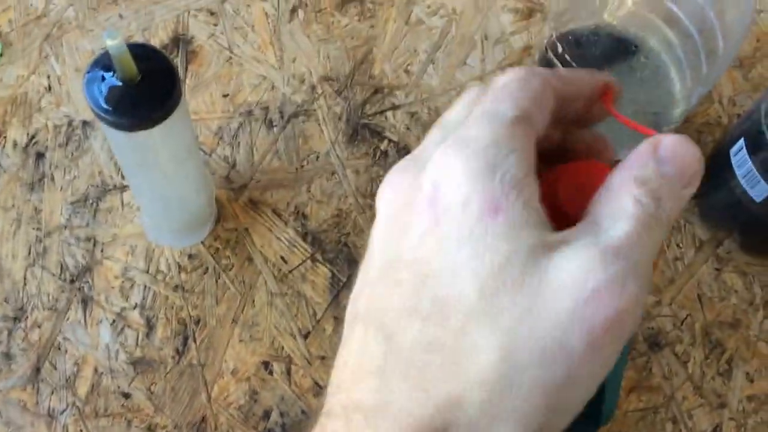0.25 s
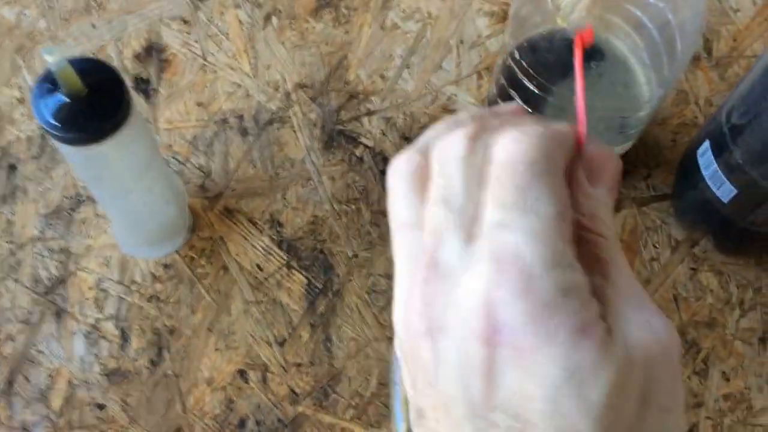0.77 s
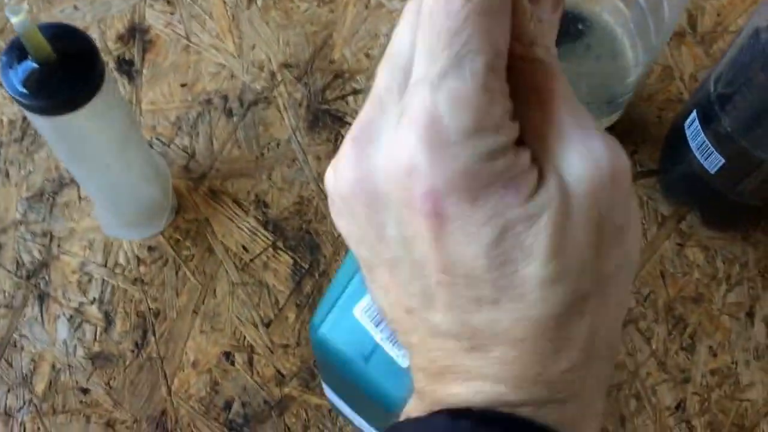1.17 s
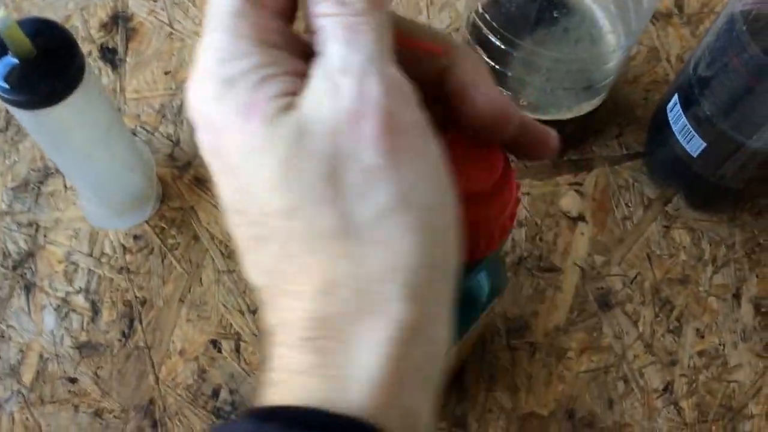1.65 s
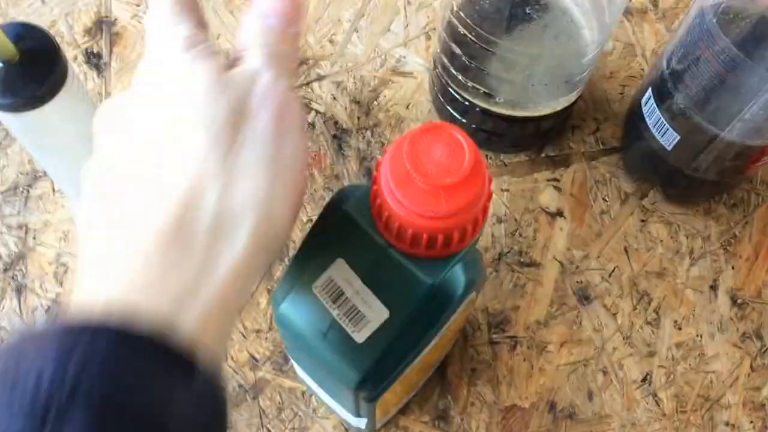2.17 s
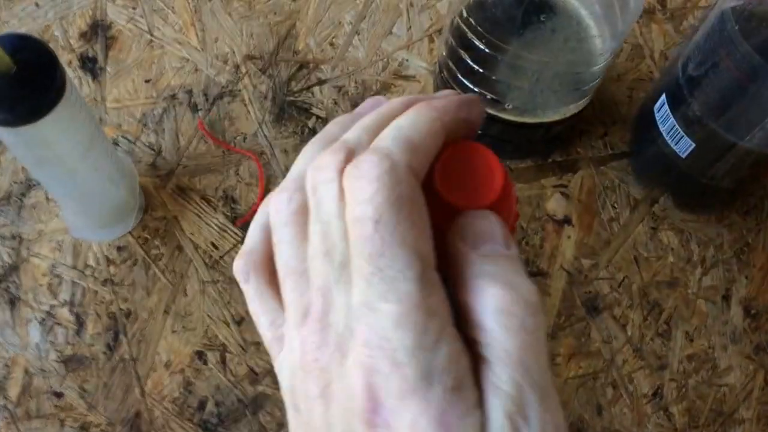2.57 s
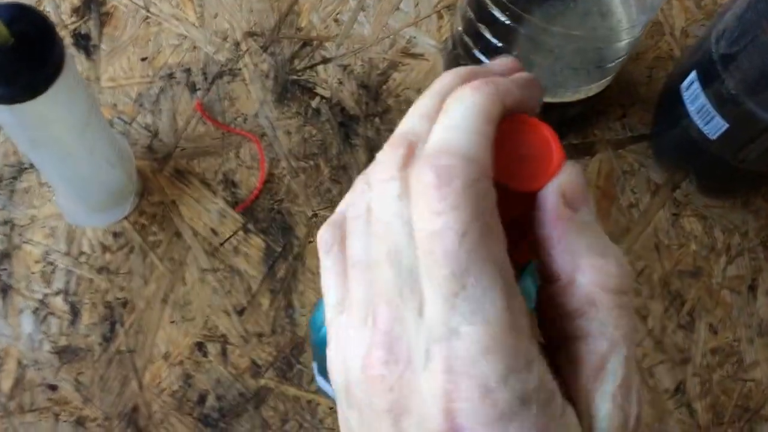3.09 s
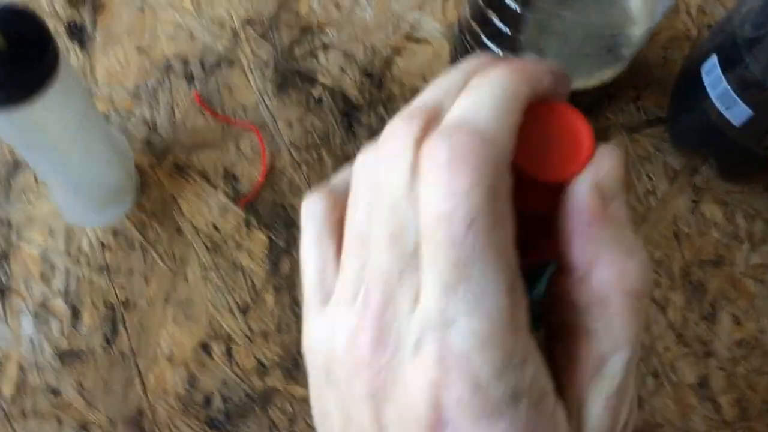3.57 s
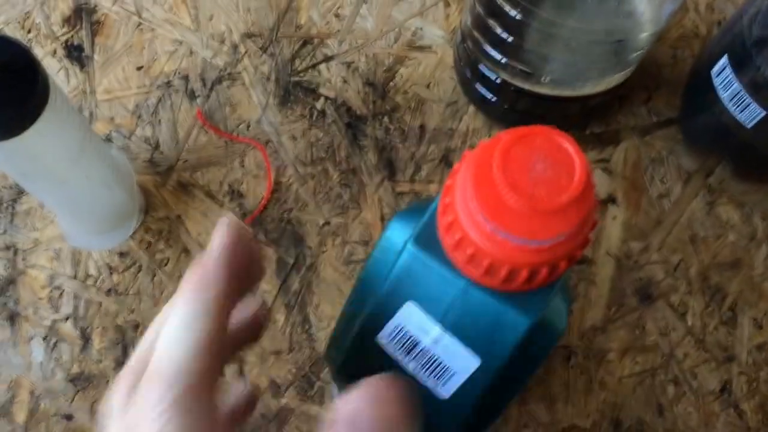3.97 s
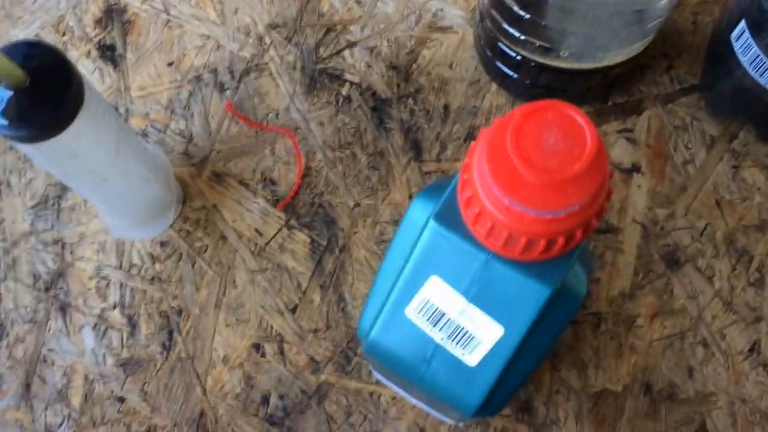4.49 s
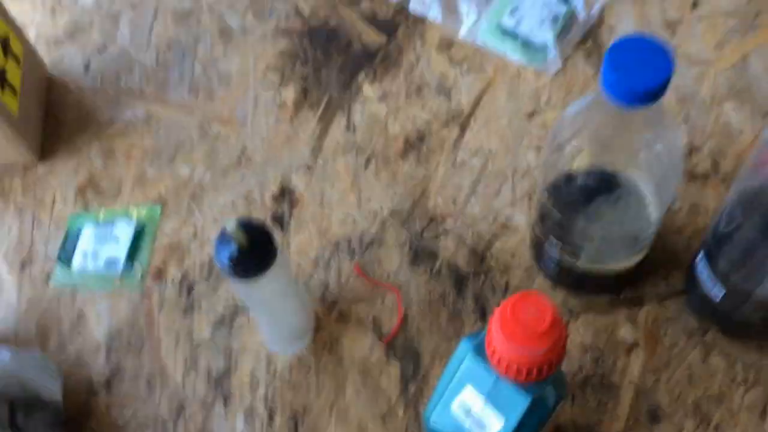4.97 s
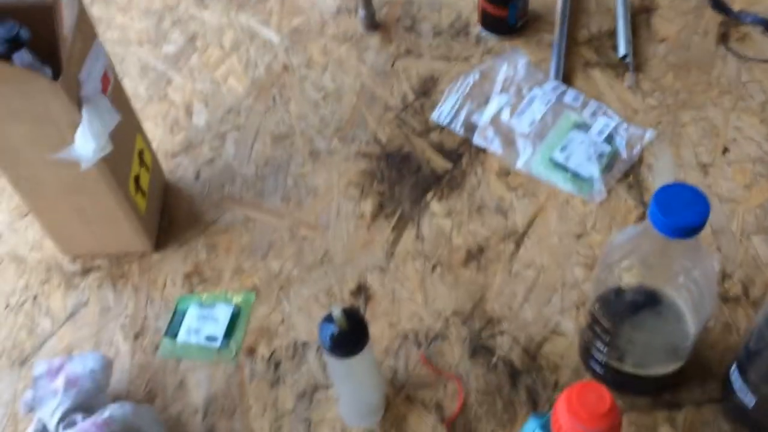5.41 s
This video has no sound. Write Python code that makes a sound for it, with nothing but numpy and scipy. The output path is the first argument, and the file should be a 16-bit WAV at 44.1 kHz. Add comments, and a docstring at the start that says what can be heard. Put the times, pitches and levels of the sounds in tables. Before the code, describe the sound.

Close, crisp crackling snaps as a bottle seal is ripped away, then faint ticks, quiet handling, a sleeve swish and a shoe scuff.

```python
"""Close to the microphone, hands rub on plastic at a chipboard bench: soft sliding hiss, hollow below.
From 1.1 s a hand tears the seal strip off a bottle cap: its bridges snap as sharp pulses and jolt the bench.
The strip is dropped; light contacts tick as decaying clusters of modes; handling and clothes slide on.
At 4.3 s a sleeve swishes as coloured noise; from 5.3 s a shoe scuffs as the person steps back.
The reverberation of a small workshop, a low rumble and faint air lie under it all."""
import sys
import numpy as np
from scipy import signal
from scipy.fft import rfft, irfft, next_fast_len
from scipy.io import wavfile

SR = 44100
rng = np.random.default_rng(int(sys.argv[2]) if len(sys.argv) > 2 else 0)


def generate_wav(signal):
    """Clip the signal to [-1, 1] and save it as 16-bit WAV at the path in sys.argv[1]."""
    frames = np.transpose(np.atleast_2d(signal))
    scaled = np.clip(frames, -1, 1) * 32767
    pcm = np.round(scaled).astype(np.int16)
    wavfile.write(sys.argv[1], SR, pcm)


N = 248988
TIME = np.arange(N) / SR


def amp(db):
    """Decibels to gain."""
    return 10 ** (np.asarray(db) / 20)


def unit(x):
    """Scales to rms 1."""
    return x / np.sqrt(np.mean(x ** 2) + 1e-20)


def read(points, hz):
    """Reads a curve on a log-frequency axis."""
    f, value = np.transpose(points)
    return np.interp(np.log(hz + 1), np.log(f + 1), value)


def level(rows):
    """Turns level points over time into a gain curve, joined linearly in gain."""
    s, db = np.transpose(rows)
    return np.interp(TIME, s, amp(db))


def add(mix, s, sound):
    """Mixes a sound in at time s, cut off at the end of the mix."""
    part = mix[max(round(s * SR), 0):][:len(sound)]
    part += sound[:len(part)]


def coloured(x, spectrum):
    """Filters a signal with a spectrum and scales it to rms 1."""
    size = next_fast_len(len(x))
    gain = amp(read(spectrum, np.fft.rfftfreq(size, 1 / SR)))
    return unit(irfft(rfft(x, size) * gain, size)[:len(x)])


def impulse(gain_db):
    """The sharpest causal pulse with this spectrum (minimum phase), at energy 1."""
    log_gain = np.log(amp(np.r_[gain_db, gain_db[-2:0:-1]]))
    pulse = np.fft.ifft(np.exp(np.conj(signal.hilbert(log_gain)))).real
    return pulse / np.linalg.norm(pulse)


def friction(spectrum, slips_per_s, spread_db, smooth):
    """Sliding surfaces: countless tiny slips of uneven size over a smooth hiss, at rms 1."""
    sizes = amp(spread_db * np.minimum(rng.exponential(1, N), 4))
    slips = sizes * rng.choice([-1, 1], N) * (rng.random(N) < slips_per_s / SR)
    return coloured(unit(slips) + smooth * rng.standard_normal(N), spectrum)


def strokes(rows, axis=3, curve=1.2):
    """Gain of sliding strokes: each speeds up, peaks and slows to rest; loudness is speed ** curve.

    axis picks the level column; overlapping strokes add in power."""
    power = np.zeros(N)
    for row in rows:
        s, rise_s, fall_s = row[:3]
        ramp = np.interp(TIME, [s - rise_s, s, s + fall_s], [0, 1, 0])
        speed = np.sin(np.pi / 2 * ramp)
        power += (amp(row[axis]) * speed ** curve) ** 2
    return np.sqrt(power)


def contacts(rows, attack_s, size=16384):
    """Light contacts: a dense cluster of quickly dying modes around one pitch."""
    out, t, hz = np.zeros(N), np.arange(size) / SR, np.fft.rfftfreq(size, 1 / SR)
    for s, db, pitch_hz, octaves, t60 in rows:
        distance = np.log2((hz + 1) / pitch_hz) / octaves
        shape = 1 / (1 + distance ** 2) ** 1.1
        cluster = unit(irfft(shape * np.exp(2j * np.pi * rng.random(len(hz)))))
        envelope = amp(db - 60 * t / t60) * np.minimum(t / attack_s, 1)
        add(out, s, envelope * cluster)
    return out


# bridges of the seal snapping: t/s, crack level/dB, brightness/dB per octave, strip ring f/Hz,
# ring level/dB, bottle wall f/Hz, wall level/dB, bench jolt level/dB
BRIDGE_SNAPS = [(1.0941, 5.5, 2.1, 6510, -14.5, 1400, -23, -36.5),
                (1.1414, 4, 2.9, 6240, -2.5, 1320, -22, -38), (1.1939, 4, 3, 6280, -4.5, 1120, -25, -40.5),
                (1.2146, -0.5, 2.6, 6140, -17, 1150, -40, -50.5),
                (1.2209, 4, 1.5, 7700, -15, 1550, -23, -42), (1.2289, 6, 3.2, 7170, -14, 1400, -24.5, -45),
                (1.2394, -1, -0.7, 5100, -20.5, 1200, -32.5, -45.5),
                (1.2796, -13.5, -3.5, 4264, -29, 1300, -33.5, -42.5),
                (1.3523, 4, -1.5, 4300, -4.5, 900, -15.5, -36.5)]
# spectrum of a crack: f/Hz, level/dB
CRACK_SPECTRUM = [(100, -19), (550, -13.5), (850, -8), (1250, -4.5), (2200, -11), (3200, -8), (4500, -3.5),
                  (6500, -1.5), (9000, -11), (11000, -6.5), (13000, -17), (15500, -19.5)]


def snap_sounds(size=2048):
    """Each bridge cracks, recoils, and rings strip and bottle; returns near sound and room feed."""
    ring_t60, wall_t60 = 0.0042, 0.015  # s
    recoil_share, recoil_s = 0.28, .00017
    scatter_db, scatter_s, ring_share = -6, 0.0016, 0.44
    lag_s = .0007  # bending-wave delay at 1 kHz
    echo_gain, echo_s = 0.1, 0.0015
    near, spread = np.zeros(N), np.zeros(N)
    t, hz = np.arange(size) / SR, np.fft.rfftfreq(size, 1 / SR)
    # bending waves: the lower the pitch, the later it leaves the plastic
    bending = np.exp(-4j * np.pi * lag_s * np.sqrt(1000 * hz))
    fade = np.cos(np.pi / 2 * np.arange(size) / size) ** 2
    for s, crack_db, bright_db, ring_hz, ring_db, wall_hz, wall_db, _ in BRIDGE_SNAPS:
        tilt_db = bright_db * np.log2(np.maximum(hz, 700) / 6000)
        crack = amp(crack_db) * impulse(read(CRACK_SPECTRUM, hz) + tilt_db)
        # the torn end whips back
        recoil = recoil_share * irfft(rfft(crack) * np.exp(-2j * np.pi * hz * recoil_s))
        ring = amp(ring_db - 60 * t / ring_t60) * np.cos(2 * np.pi * ring_hz * t)
        ring *= 1 - np.exp(-t / .00008)  # soft onset
        wall = amp(wall_db - 60 * t / wall_t60) * np.sin(2 * np.pi * wall_hz * t)
        direct = irfft(rfft(recoil - crack - ring - wall) * bending) * fade
        # hand and bottles scatter the crack for a few milliseconds
        paths = rng.standard_normal(size) * (t / scatter_s) ** 2 * np.exp(-2 * t / scatter_s)
        paths *= amp(scatter_db) / np.linalg.norm(paths)
        add(near, s, direct)
        add(near, s + echo_s, echo_gain * direct)  # off the bench top
        add(near, s, signal.fftconvolve(crack + ring_share * ring, paths))
        untilted_crack = amp(crack_db) * impulse(read(CRACK_SPECTRUM, hz))
        add(spread, s, untilted_crack + 0.3 * ring)
    return near, spread


# modes of the bench with the bottle on it: f/Hz, level/dB, t60/s
BENCH_MODES = [(72, -9, 0.42), (133, 1, 0.24), (196.5, 1.5, 0.087), (264, -5.5, 0.087), (355, -11, 0.11),
               (541.6, -8, .06), (830, -4.5, 0.047), (1026, -12, 0.17), (2430, -16, 0.17)]
# the bottle rocking on the bench: t/s, level/dB, highest f/Hz that the blow reaches
BOTTLE_KNOCKS = [(0.167, -48, 450), (0.206, -52, 400), (0.272, -53, 450), (1.375, -33.5, 500),
                 (1.393, -40, 350), (1.529, -45, 200), (1.566, -40.5, 204), (1.666, -42, 180.8),
                 (1.706, -51, 176.7), (2.3211, -49, 1500), (2.3418, -49.5, 1500), (2.4791, -57, 1190),
                 (2.964, -46, 169), (4.051, -44.5, 168)]


def bench():
    """Every jolt of the bottle rings the decaying modes of the board under it."""
    out, t = np.zeros(N), np.arange(SR // 2) / SR
    modes = [(hz, amp(db - 60 * t / t60) * np.sin(2 * np.pi * hz * t)) for hz, db, t60 in BENCH_MODES]
    full_jolt = sum(mode for hz, mode in modes)
    for s, *_, jolt_db in BRIDGE_SNAPS:
        add(out, s, amp(jolt_db) * full_jolt)
    for s, db, reach_hz in BOTTLE_KNOCKS:
        # a soft blow reaches only the low modes
        soft_blow = sum(mode / (1 + (hz / reach_hz) ** 4) for hz, mode in modes)
        add(out, s, amp(db) * soft_blow)
    return out


# nail and strip on plastic and wood: t/s, level/dB, centre f/Hz, width/octaves, t60/s
SMALL_TICKS = [(0.166, -52, 900, 0.82, 0.014), (0.2738, -46.5, 10600, .5, 0.013),
               (0.372, -52.5, 12500, 0.56, 0.013), (0.4923, -45.5, 7500, 0.25, 0.019),
               (1.463, -46, 9850, 1.3, 0.016), (2.3216, -39, 1080, 0.65, 0.029),
               (2.3428, -41.5, 1050, 1.4, 0.054), (2.3426, -36.5, 1090, 2.9, 0.022),
               (2.3458, -33, 9900, 1, 0.027), (2.4793, -36.5, 5160, 1.2, 0.019),
               (2.54, -54.5, 3450, 1.5, .025), (3.302, -51, 6000, 0.81, 0.016)]


def ticks():
    """Nail and strip tick on plastic and wood with a near-instant attack."""
    return contacts(SMALL_TICKS, attack_s=.0002)


# soft sliding, hands on plastic, later handling and clothes: t/s of top speed, speeding up/s,
# slowing down/s, hiss level/dB, hollow level/dB
RUB_STROKES = [(0.04, 0.079, 0.081, -63.5, -72), (0.2, 0.02, 0.038, -60, -76), (0.36, 0.24, .2, -80, -65.5),
               (0.44, 0.018, 0.038, -58.5, -63.5), (0.58, 0.16, 0.14, -62.5, -64.5),
               (0.665, 0.07, 0.18, -64, -81), (1.0, 0.19, .1, -65.5, -73), (1.51, 0.11, 0.095, -60.5, -63),
               (1.73, 0.14, 0.092, -65, -77), (1.82, .06, 0.043, -63.5, -83),
               (1.935, 0.035, .03, -68.5, -80), (2.53, .04, 0.056, -66.5, -67),
               (2.65, 0.074, .06, -65, -77), (2.75, 0.084, .04, -63.5, -75),
               (2.835, 0.045, 0.035, -62, -73), (2.94, 0.12, 0.17, -71.5, -67.5),
               (3.083, 0.022, 0.054, -59, -62.5), (3.2, 0.079, 0.08, -63.5, -61),
               (3.31, 0.093, 0.12, -63.5, -61), (3.445, 0.11, 0.068, -60.5, -62.5),
               (3.67, 0.034, .06, -62, -62.5), (3.77, 0.085, 0.094, -55.5, -61),
               (3.805, 0.03, 0.051, -50.5, -70), (3.89, 0.082, 0.073, -61.5, -64),
               (4.205, 0.016, 0.075, -63, -66), (4.4, 0.43, 0.42, -70, -67), (4.69, 0.21, .18, -62, -61),
               (4.965, 0.02, 0.023, -65, -66.5), (5.15, 0.31, 0.32, -64, -60.5)]
# spectrum of the sliding hiss: f/Hz, level/dB
HISS_SPECTRUM = [(1500, -46), (4000, -7.5), (7000, 0.5), (9000, 0), (11000, 1), (15500, -4.5)]
# spectrum of the hollow rubbing: f/Hz, level/dB
HOLLOW_SPECTRUM = [(100, -35.5), (400, -7), (950, 6.5), (1400, -4), (1900, -1), (2500, -4.5), (3550, -3.5),
                   (5000, -7), (9000, -16)]


def rubs():
    """Soft sliding hiss over a hollow rubbing sound: hands on plastic, later handling and clothes."""
    hiss = friction(HISS_SPECTRUM, slips_per_s=3100, spread_db=3.5, smooth=1.1)
    hollow = friction(HOLLOW_SPECTRUM, slips_per_s=1900, spread_db=0.5, smooth=1.2)
    return strokes(RUB_STROKES) * hiss + strokes(RUB_STROKES, axis=4) * hollow


# faint dry squeaks: t/s of top speed, speeding up/s, slowing down/s, level/dB, f/Hz
SQUEAK_STROKES = [(2.968, 0.0073, .01, -65, 3470), (3.4, 0.29, .15, -68, 3600), (3.81, .05, .04, -57, 7100),
                  (4.495, 0.053, 0.05, -62.5, 3540)]


def squeaks(q=7):
    """Something squeaks faintly near one pitch: noise through two equal resonances."""
    out = np.zeros(N)
    for *stroke, pitch_hz in SQUEAK_STROKES:
        resonance = signal.iirpeak(pitch_hz, q, SR)
        once = signal.lfilter(*resonance, rng.standard_normal(N))
        squeak = unit(signal.lfilter(*resonance, once))
        out += strokes([stroke]) * squeak
    return out


# fingers shifting their grip: t/s, level/dB, centre f/Hz, width/octaves, t60/s
GRIP_SHIFTS = [(0.164, -51, 250, 0.47, 0.41), (0.265, -56, 280, 0.37, 0.25), (0.83, -60.5, 360, 0.63, 0.14),
               (1.01, -53, 300, 0.76, .15), (3.615, -58, 310, 0.49, .45)]


def grips():
    """Fingers shift their grip: dull, low contacts with a soft attack."""
    return contacts(GRIP_SHIFTS, attack_s=.006)


# a sleeve swishing past: t/s of top speed, speeding up/s, slowing down/s, level/dB
SLEEVE_STROKES = [(4.326, 0.084, 0.023, -43)]
# spectrum of the cloth: f/Hz, level/dB
CLOTH_SPECTRUM = [(590, -57), (1000, -24), (1100, -15), (1580, -15), (3410, -11.5), (6190, -1),
                  (14100, -1.5), (15500, -8)]


def sleeve():
    """Cloth swishes as smooth noise whose loudness rises steeply with speed."""
    return strokes(SLEEVE_STROKES, curve=3.1) * coloured(rng.standard_normal(N), CLOTH_SPECTRUM)


# shoe on the floor: t/s of top speed, speeding up/s, slowing down/s, sole level/dB, grit level/dB
SHOE_DRAGS = [(5.321, 0.014, 0.043, -42.5, -45), (5.39, 0.087, 0.18, -46.5, -54.5),
              (5.476, 0.048, 0.04, -47.5, -35), (5.55, 0.17, 0.23, -55.5, -57.5),
              (5.645, 0.054, .03, -51.5, -54.5)]
# spectrum of the sole: f/Hz, level/dB
SOLE_SPECTRUM = [(70, -37), (250, -23), (550, -4), (800, -2), (1150, 3.5), (1600, 3), (2100, -16),
                 (2800, -7.5), (4000, -15.5), (8000, -17)]
# spectrum of the grit: f/Hz, level/dB
GRIT_SPECTRUM = [(100, -16), (500, -2.5), (2000, 3.5), (4000, -1.5), (6500, 2.5), (10000, -1),
                 (15500, -8.5)]
# the sole catching on the floor: t/s, level/dB, centre f/Hz, width/octaves, t60/s
SOLE_CATCHES = [(5.315, -57, 1200, 0.54, 0.04), (5.324, -46.5, 2760, 0.28, .16),
                (5.364, -51, 2700, 0.22, 0.083), (5.362, -41, 1190, 0.51, 0.088),
                (5.446, -29.5, 1060, 0.86, 0.025), (5.468, -38.5, 590, 0.46, 0.037),
                (5.6075, -41.5, 730, 0.29, 0.037), (5.623, -45, 980, 1.3, 0.078),
                (5.639, -38.5, 880, 0.56, 0.067)]


def shoe():
    """The sole drags with a dull rasp, catches, and grinds grit under it."""
    sole = friction(SOLE_SPECTRUM, slips_per_s=500, spread_db=1.5, smooth=0.77)
    grit = friction(GRIT_SPECTRUM, slips_per_s=2600, spread_db=1, smooth=0.97)
    drags = strokes(SHOE_DRAGS) * sole + strokes(SHOE_DRAGS, axis=4) * grit
    return drags + contacts(SOLE_CATCHES, attack_s=0.00048)


# decay of the workshop reverberation: f/Hz, t60/s
REVERB_T60 = [(200, 1.2), (530, 0.52), (1400, 0.48), (3700, 0.71), (9700, .5), (15000, 0.36)]
# colour of the workshop reverberation: f/Hz, level/dB
REVERB_COLOUR = [(100, 17), (500, 10), (1000, 5.5), (1900, 2.5), (2450, 7.5), (3300, 0), (4400, -0.5),
                 (6000, -0.5), (10000, -1), (15000, 1)]


def room(x):
    """Separate reflections thicken into a short tail, each band dying at its own speed."""
    gap_s, early_db, early_s = 0.0026, 4, .03
    first_share, thicken_s = 0.035, .15  # share of samples that hold a reflection at first
    share = np.minimum(first_share + (TIME[:SR] / thicken_s) ** 2, 1)
    echoes = rng.standard_normal(SR) * (rng.random(SR) < share) / np.sqrt(share)
    hz, frame_s, bands = signal.stft(echoes, SR, nperseg=256)
    decay_db = -60 * frame_s / read(REVERB_T60, hz)[:, None]
    bands = bands * amp(read(REVERB_COLOUR, hz)[:, None] + decay_db)
    tail, t = signal.istft(bands, SR, nperseg=256)[1][:SR], TIME[:SR]
    # silence before the first reflection, then a boost that fades
    tail *= (t > gap_s) * amp(early_db * np.exp(-t / early_s))
    return signal.fftconvolve(x, tail / np.linalg.norm(tail))[:N]


# spectrum of the low rumble: f/Hz, level/dB
RUMBLE_SPECTRUM = [(20, -34), (40, -8.5), (70, 4.5), (100, -2), (130, -1.5), (200, -6.5), (300, -21),
                   (600, -35.5), (2000, -68)]
# course of the low rumble: t/s, level/dB
RUMBLE_LEVEL = [(0, -54.5), (1.9, -52.5), (2.2, -55.5), (3, -54), (4.95, -53.5), (5.1, -58.5), (5.65, -58)]
# spectrum of the workshop air: f/Hz, level/dB
AIR_SPECTRUM = [(100, 6.5), (400, 2.5), (650, -1.5), (950, -1.5), (1500, -9), (3000, -15), (8000, -18.5),
                (15500, -22)]


def background(air_db=-62):
    """An uneven low rumble under the steady faint air of the workshop, both coloured noise."""
    rumble = level(RUMBLE_LEVEL) * coloured(rng.standard_normal(N), RUMBLE_SPECTRUM)
    air = amp(air_db) * coloured(rng.standard_normal(N), AIR_SPECTRUM)
    return rumble + air


def scene(snap_room_db=-13, tick_room_db=-7, rub_room_db=-14):
    """Mixes all sources; snaps, ticks, handling and shoe each send a share into the room."""
    cracks, spread = snap_sounds()
    taps = ticks()
    handling = rubs() + squeaks() + grips() + sleeve() + shoe()
    wet = room(amp(snap_room_db) * spread + amp(tick_room_db) * taps + amp(rub_room_db) * handling)
    return (cracks + bench() + taps + handling + wet + background())[None]


def record(dry, low_cut_hz=32, edge_hz=15350):
    """The microphone loses the lowest bass and the loudest peaks clip; then the treble is cut off."""
    thinned = signal.lfilter(*signal.butter(2, low_cut_hz, "high", fs=SR), dry)
    clipped = np.clip(thinned, -1, 1)
    band_limit = signal.firwin(301, edge_hz, window=("kaiser", 8), fs=SR)
    return signal.oaconvolve(clipped, band_limit[None], "same")


dry = scene()
out = record(dry)
generate_wav(out)
```